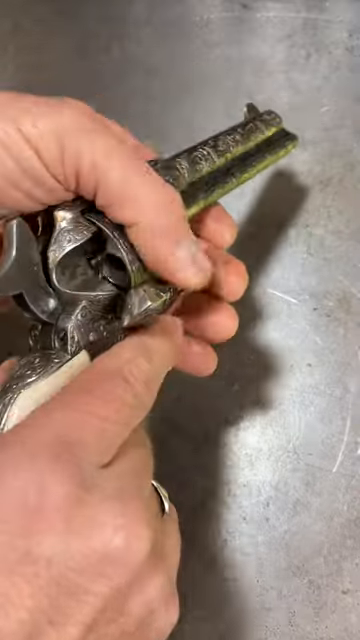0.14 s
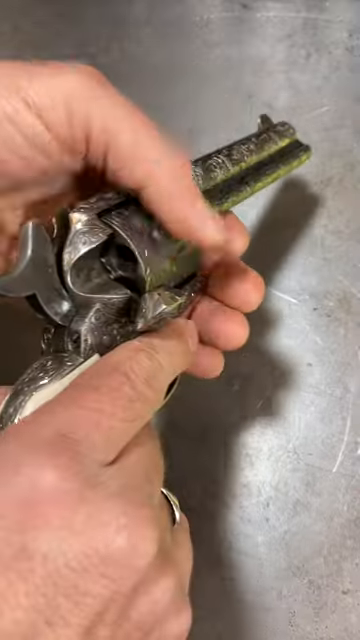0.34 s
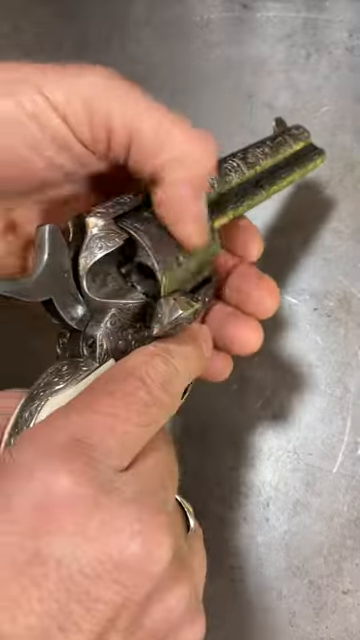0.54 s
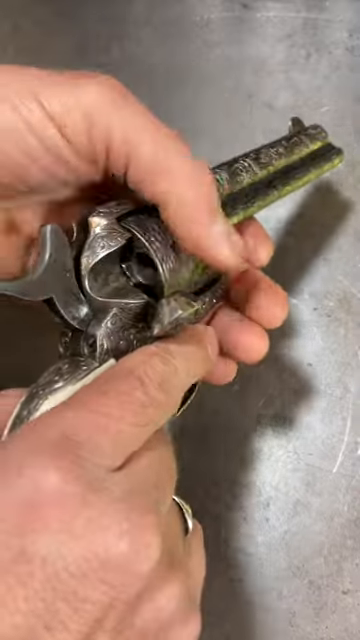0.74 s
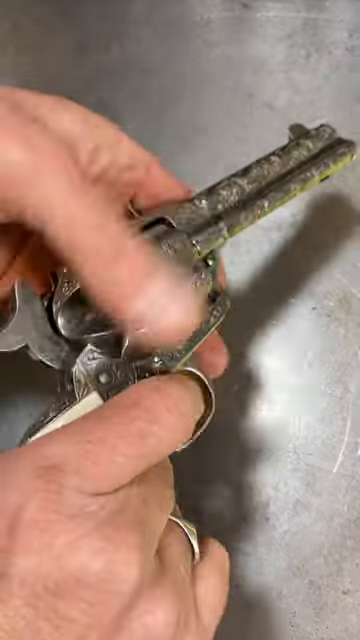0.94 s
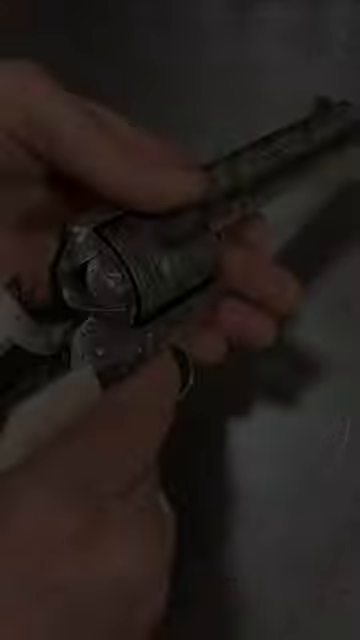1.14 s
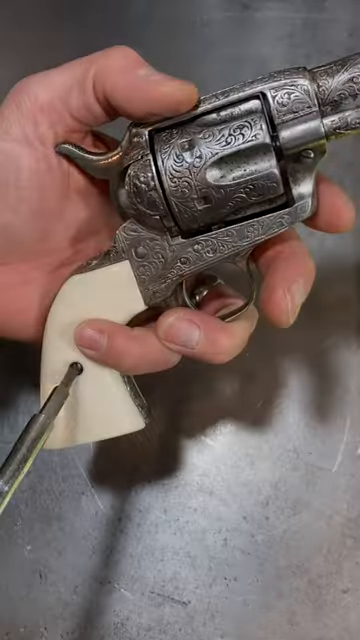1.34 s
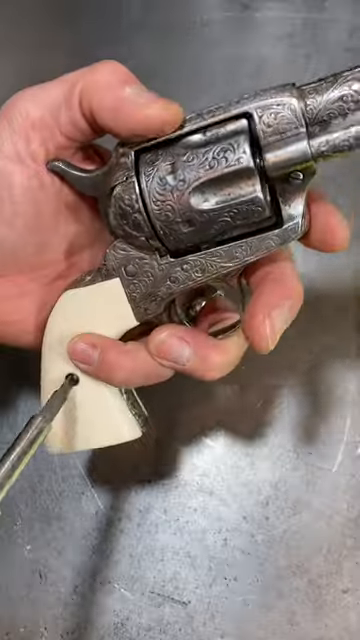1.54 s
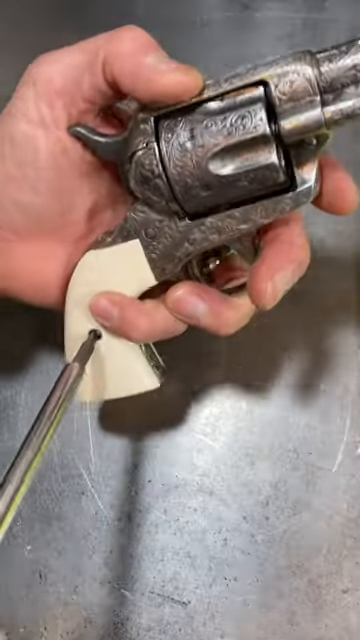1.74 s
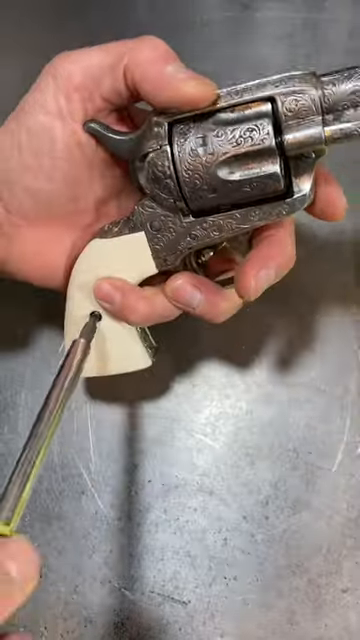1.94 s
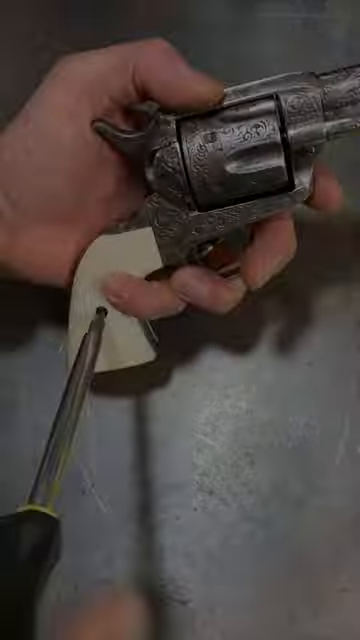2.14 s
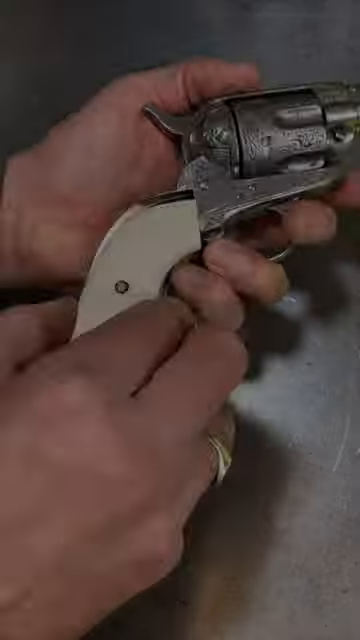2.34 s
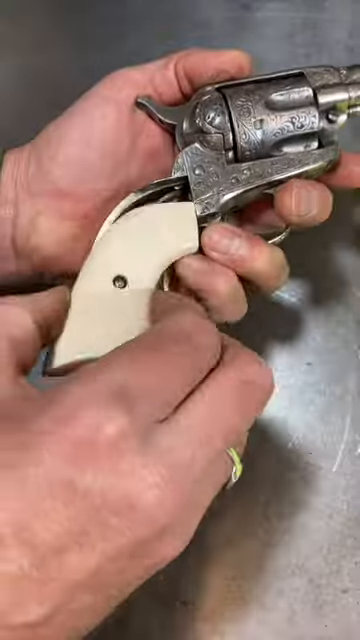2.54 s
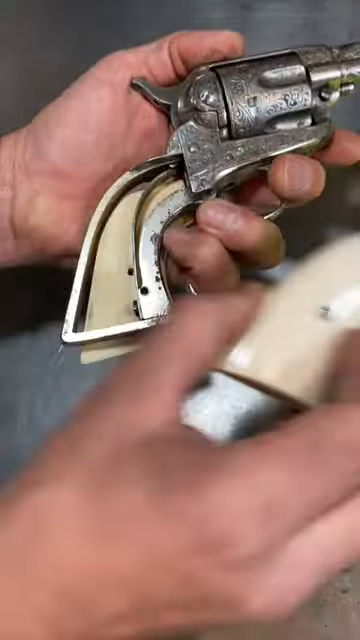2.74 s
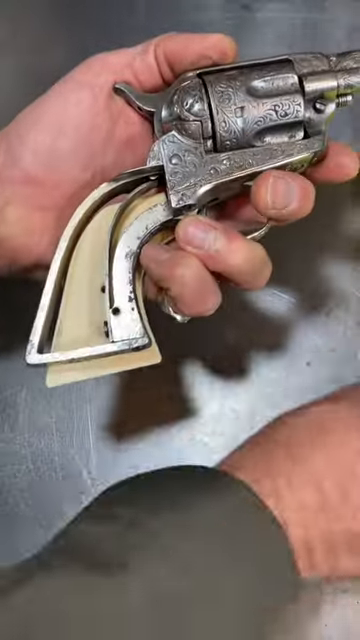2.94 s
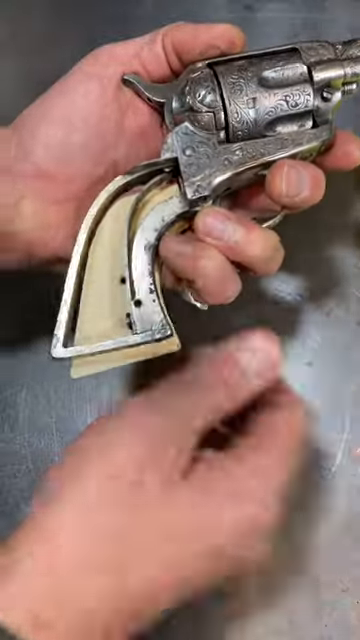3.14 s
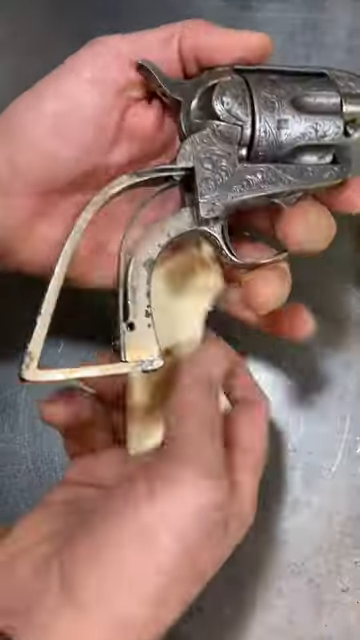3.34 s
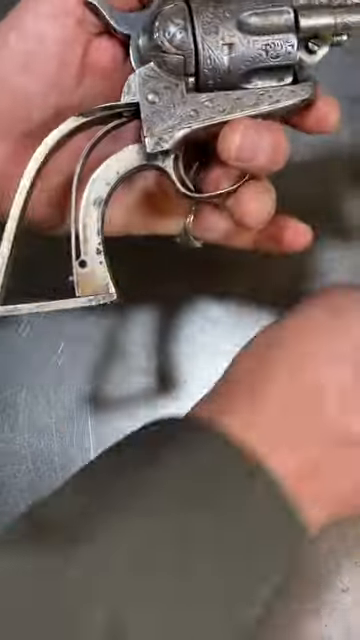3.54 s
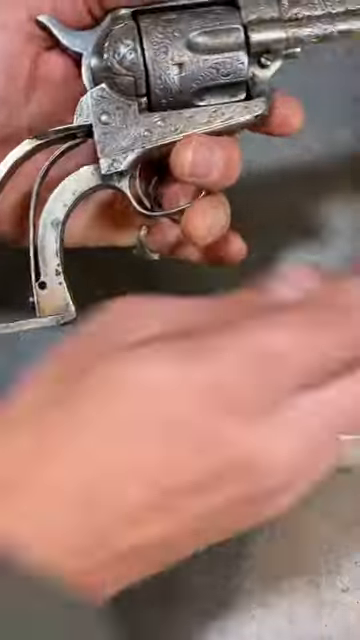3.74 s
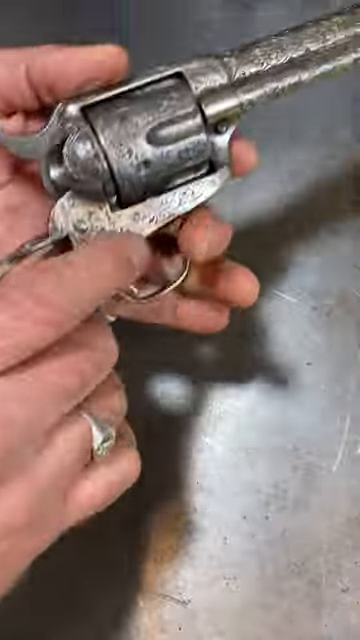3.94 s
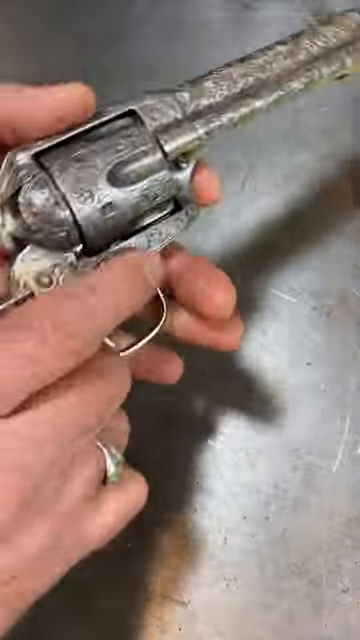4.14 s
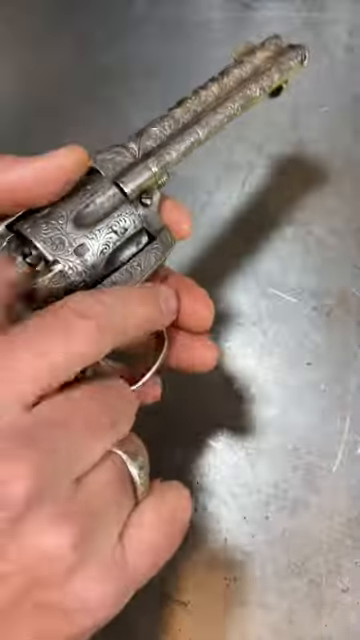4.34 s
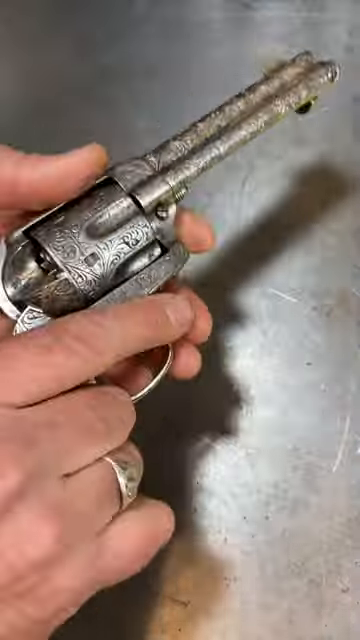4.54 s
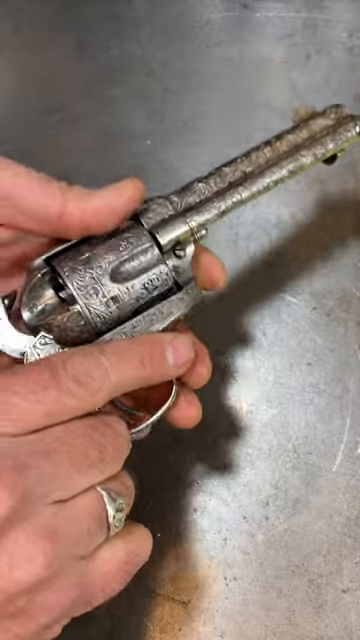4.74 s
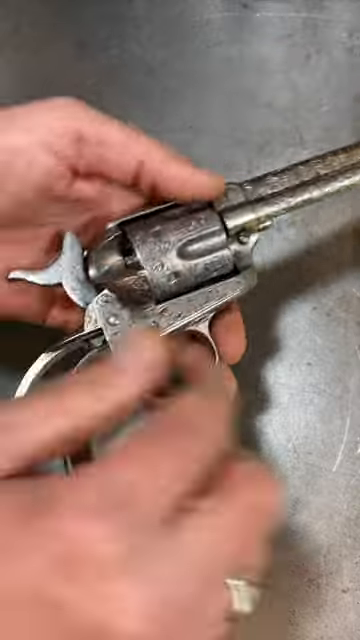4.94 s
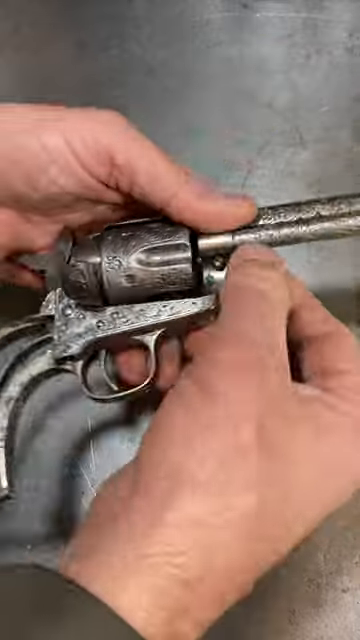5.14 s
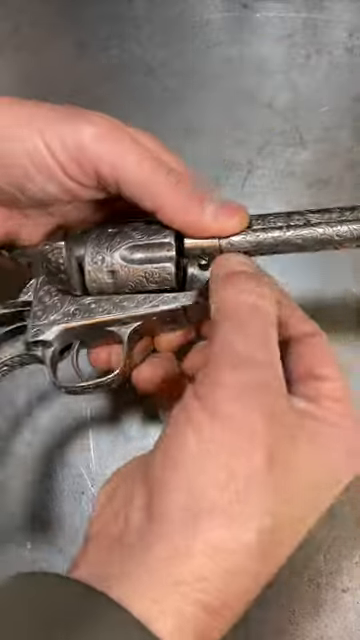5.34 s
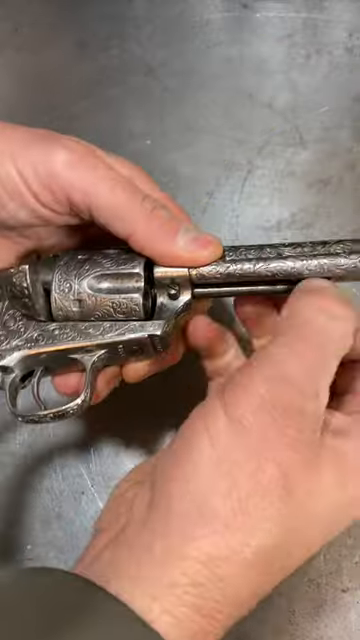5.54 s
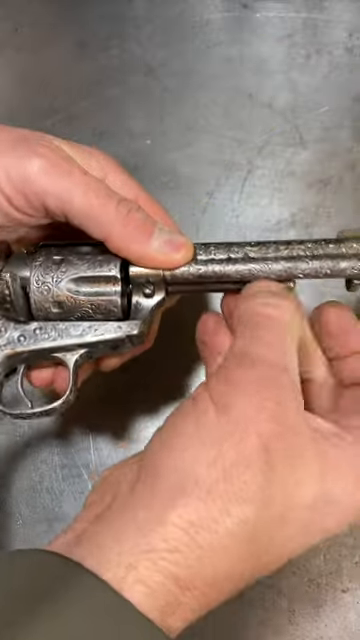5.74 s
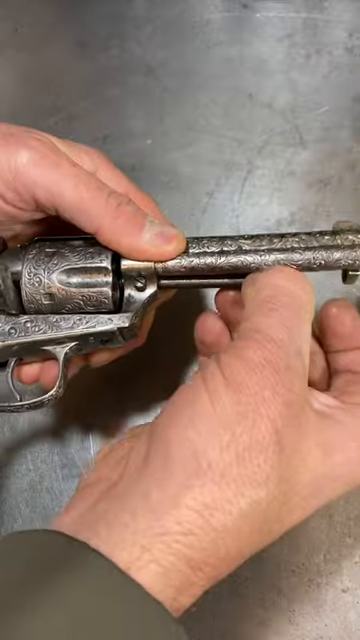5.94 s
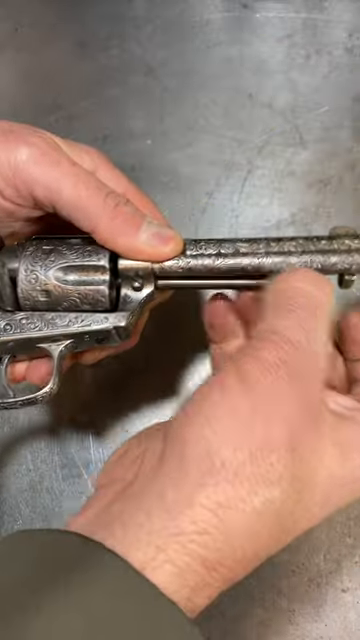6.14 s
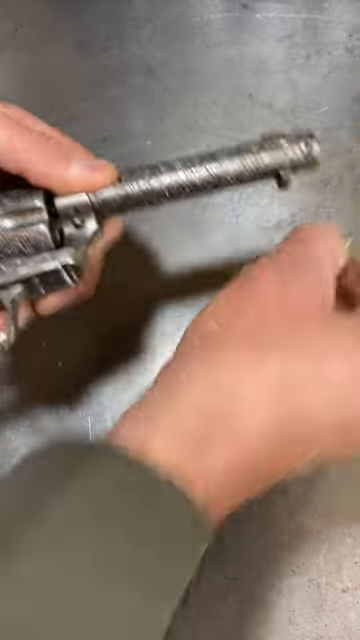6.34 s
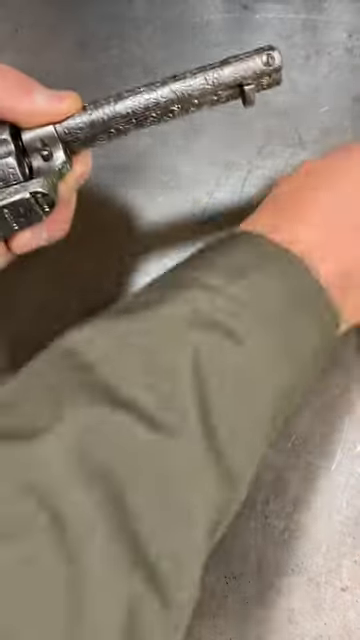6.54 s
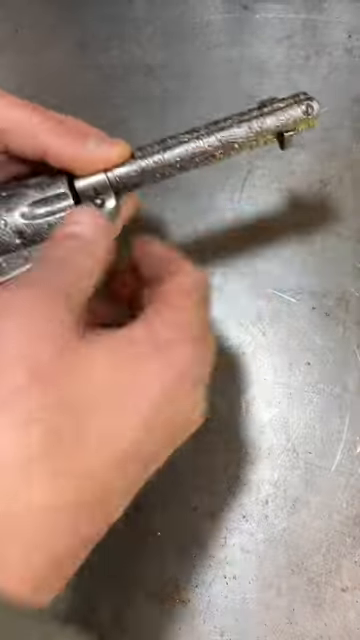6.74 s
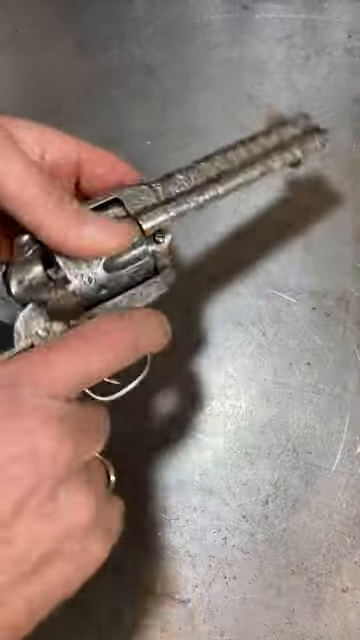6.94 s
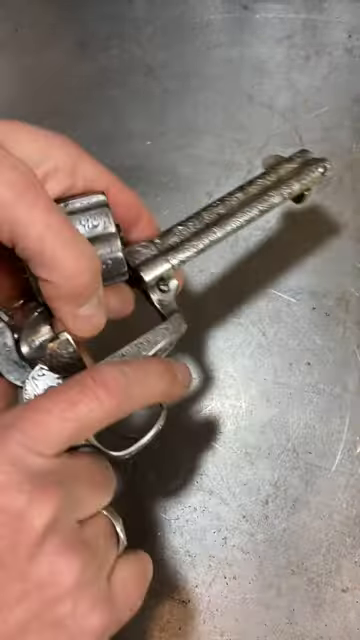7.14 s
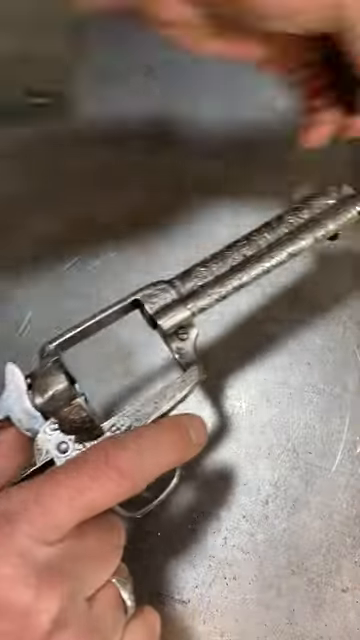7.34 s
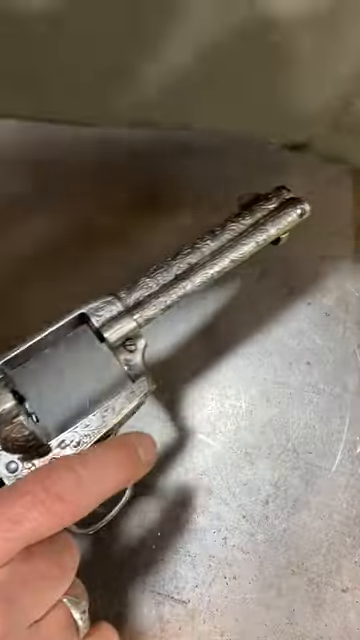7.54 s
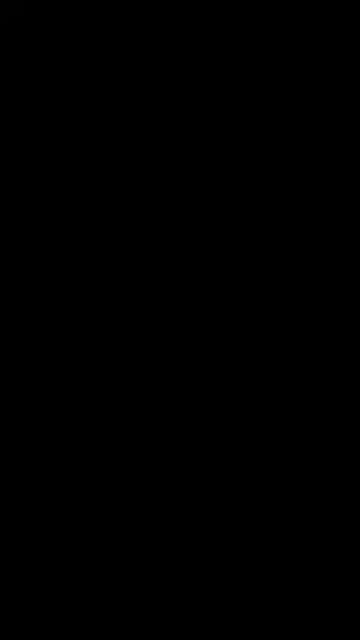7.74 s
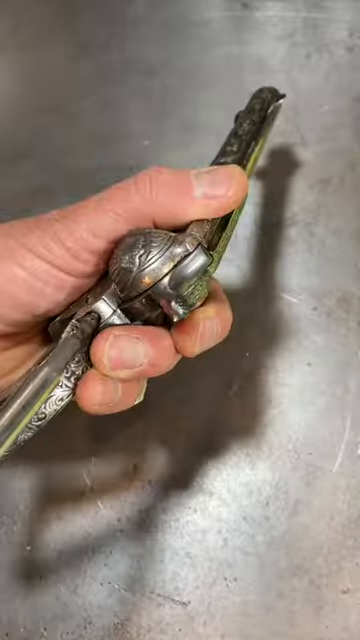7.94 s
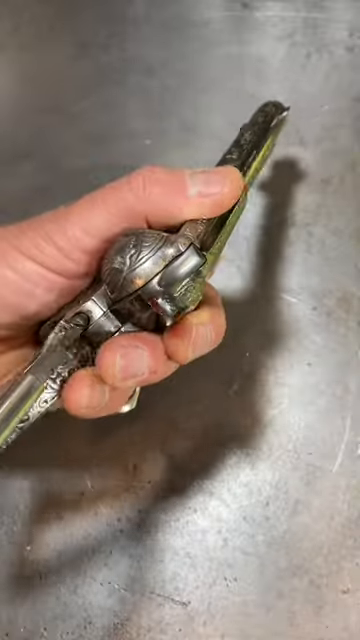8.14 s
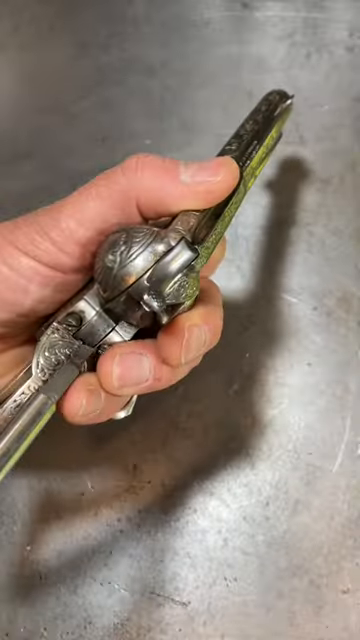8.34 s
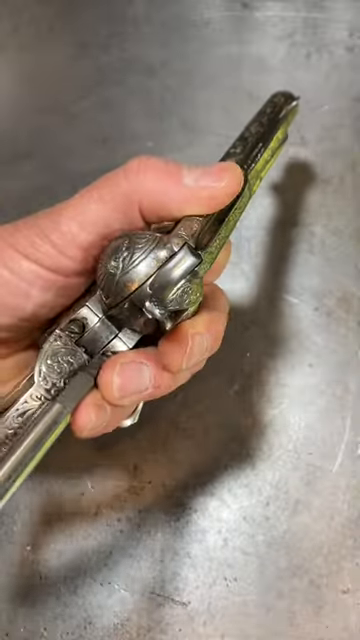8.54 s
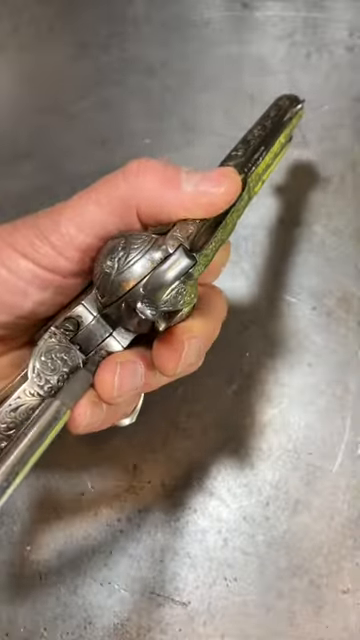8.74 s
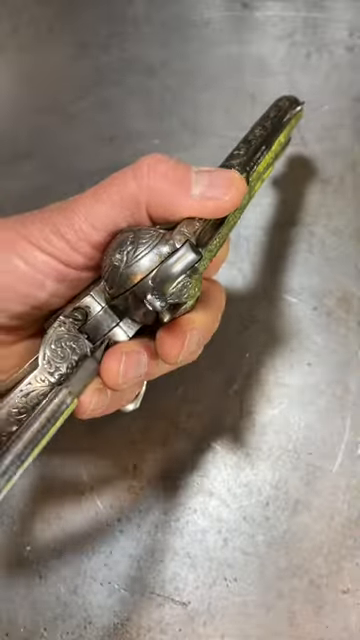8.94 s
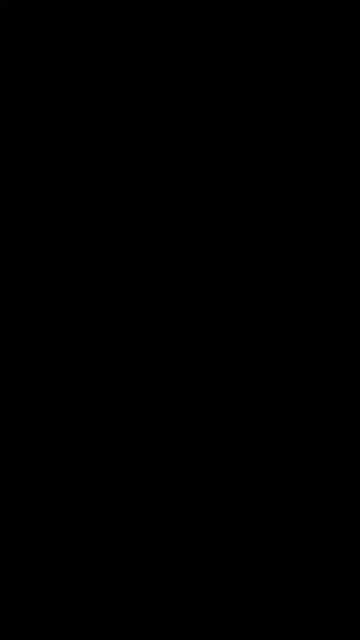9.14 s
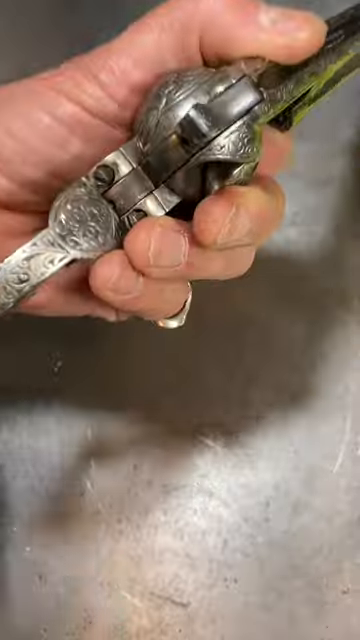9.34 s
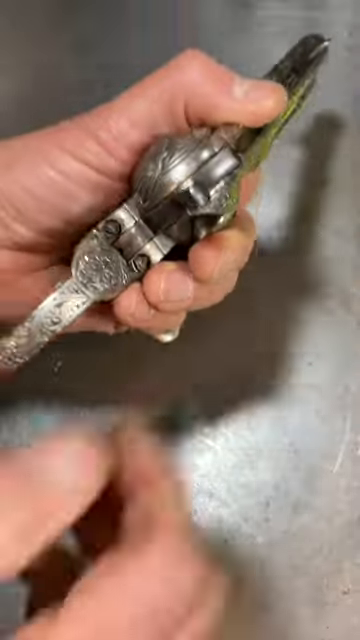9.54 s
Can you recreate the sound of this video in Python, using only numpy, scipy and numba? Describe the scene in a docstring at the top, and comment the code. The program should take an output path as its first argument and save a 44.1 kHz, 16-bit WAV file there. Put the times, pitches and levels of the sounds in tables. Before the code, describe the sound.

Close metallic clicks, hammer cocking, short steel scrapes and dull bench thuds as hands dismantle a single-action revolver in a small, quiet workshop.

```python
"""A single-action revolver is taken apart by hand over a steel bench, with a phone close by in a small workshop.
Steel snaps (ratchet, hammer, clicks, taps) are impulses with noisy chatter and ringing modes, tuned in brightness.
Pin and cylinder scrape in trains of slips; a grip panel chatters down; thuds are blows on the bench's modes.
A sleeve swishes as flickering noise with a gliding hollow tone.
Behind lie shaped rumble and hiss, a hum that wanders in pitch, and a short diffuse reverb."""
import sys
import numpy as np
from scipy import signal
from scipy.fft import rfft, irfft
from scipy.io import wavfile
from numba import njit

SR = 44100
rng = np.random.default_rng(int(sys.argv[2]) if len(sys.argv) > 2 else 0)


def master(y):
    """Save y as 16-bit WAV."""
    cut = np.clip(np.atleast_2d(y).T, -1, 1)
    pcm = np.round(cut * 32767)  # scale
    wavfile.write(sys.argv[1], SR, pcm.astype(np.int16))


N = 426888
TIME = np.arange(N) / SR
FREQ = np.arange(N // 2 + 1) * SR / N
TOP_HZ = 16000  # upper limit of the sound

# Steel contacts, all with: t/s, bright band level over 5 ms/dB, bright band f/Hz, frame knock level over 5 ms/dB
# the bolt drops into a notch of the turning cylinder
RATCHET_DROPS = [(0.138, -20, 10700, -58.5), (0.2932, -16.5, 13800, -57), (0.4427, -18.5, 14200, -83),
                 (0.5765, -21.5, 13100, -80), (0.7108, -21.5, 14000, -71), (0.8261, -21, 14100, -85),
                 (1.0083, -21, 7800, -47.5)]
# the bolt lifts with a light tick just before it drops
BOLT_LIFTS = [(0.101, -44, 7960, -83), (0.268, -45, 14000, -69), (0.4144, -46, 8000, -77),
              (0.8072, -45, 13000, -68)]
# single contacts of gate, screwdriver and pin
STEEL_CLICKS = [(1.1385, -23.5, 12000, -56), (1.2066, -26.5, 14200, -54), (1.3543, -41, 13700, -78),
                (1.3962, -47, 12000, -73), (1.4982, -47, 11000, -60), (1.8494, -47, 10400, -50.5),
                (2.044, -38.5, 14000, -51.5), (2.1365, -42, 11400, -54.5), (2.2041, -46, 9450, -53),
                (2.2735, -51, 5000, -62), (2.4242, -40, 7300, -55), (2.5126, -25, 8700, -53),
                (2.5178, -35, 5500, -68), (2.5301, -42, 5100, -44.5), (2.9121, -32.5, 6300, -44),
                (3.1946, -40, 6400, -43), (4.3573, -50, 3896, -72), (4.8189, -49, 7900, -60.5),
                (5.8401, -50, 3435, -66), (6.1728, -22.5, 13300, -50), (6.2553, -36.5, 14150, -59.5),
                (6.933, -32, 7050, -54.5), (7.0335, -35, 4100, -63), (7.0602, -41, 5000, -50.5),
                (7.3511, -45, 7100, -66), (7.7769, -55, 13750, -43.5), (7.9157, -31.5, 14000, -47),
                (7.9268, -38, 7050, -42.5), (8.1062, -36, 13800, -50), (8.149, -34.5, 13180, -48.5),
                (8.2194, -42, 10640, -57), (8.3111, -44, 11000, -53), (8.4716, -51, 11000, -56.5),
                (8.4956, -45.5, 12000, -59), (8.5926, -54, 4500, -58), (8.9684, -43, 11000, -50),
                (9.0678, -48, 13500, -69)]
# the hammer is drawn back through its notches; extra column: sharpness of the bright band (Q)
HAMMER_NOTCHES = [(4.291, -19, 10540, -44, 5.5), (4.5662, -27, 7000, -50, 0.23),
                  (4.7506, -29, 7940, -50, 0.35)]
# dry taps of screwdriver, base pin and cylinder against the frame
FRAME_TAPS = [(1.4083, -51, 6500, -45.5), (1.4852, -54, 10300, -53.5), (1.5078, -41.5, 9900, -43.5),
              (5.5515, -56.5, 2470, -61), (5.7177, -47.5, 3484, -45.5), (5.7313, -47.5, 3300, -53),
              (5.8145, -61, 3000, -60), (7.0837, -43, 4000, -62), (7.098, -39.5, 5860, -62),
              (7.1248, -31, 3600, -54), (7.1417, -43.5, 4300, -66), (7.3931, -48, 4490, -41)]
# colour shared by all steel contacts: f/Hz, relative level/dB
STEEL_COLOUR = [(1400, -18), (2500, -9), (4000, 4.5), (6500, 4), (9000, 3), (12000, 3.5), (14000, 11),
                (16000, 1.5)]
KNOCK_HZ, KNOCK_Q = 1670, 0.93  # the frame's dull knock under a click
# modes of the hand-damped steel frame: nominal f/Hz, relative level/dB, t60/s
FRAME_MODES = [(3370, 11.5, 0.017), (5000, 5.5, 0.033), (7070, 4, 0.024), (8100, -7.5, 0.018),
               (9980, 13, 0.016), (12000, 14, 0.0066), (12550, 2, 0.031), (14200, -7, 0.0062)]
# the cylinder sings on in many close modes: nominal f/Hz, relative level/dB
CYLINDER_MODES = [(3590, -16.5), (4400, -4), (5179, 2.5), (5850, -2.5), (7050, 1.5), (8037, -1.5),
                  (9297, -9.5), (10120, -7.5), (10360, -6), (10950, -3.5), (11780, -1), (12070, -4)]
CYLINDER_T60_S = 0.13
# the grip strap pings as a panel lets go: t/s, level before the mode weights/dB
STRAP_PINGS = [(2.5113, -38), (2.5303, -28.5), (3.195, -21.5)]
# modes of the grip strap: nominal f/Hz, relative level/dB, t60/s
STRAP_MODES = [(6370, 4, .013), (6950, -8, .01), (10150, -20, .03)]
# the base pin slides in its hole: start t/s, length/s, level/dB, grit against rasp/dB
PIN_STROKES = [(5.452, 0.042, -56, -10), (5.478, 0.038, -50, 2), (6.148, 0.019, -50.5, 0),
               (7.917, 0.0092, -56, -10)]
# modes of the loose base pin: nominal f/Hz, relative level/dB, t60/s
PIN_MODES = [(2460, 0, 0.034), (3550, 1.5, 0.021), (4600, -2, 0.023), (5900, -3, 0.022), (8300, -7, .02)]
# the cylinder judders out through the frame: start t/s, length/s, level/dB, grit against rasp/dB
CYLINDER_STROKES = [(7.024, 0.052, -43.5, -5), (7.088, 0.017, -42, -1), (7.134, 0.037, -45.5, -22)]
# modes of its chamber walls, damped by the fingers: nominal f/Hz, relative level/dB, t60/s
CHAMBER_MODES = [(2470, -7, 0.02), (3600, -5, 0.0088), (5070, 0, .012)]
# a loose grip panel clacks onto the bench: t/s, level over 30 ms/dB, t60 of the chatter/s
PANEL_CLACKS = [(3.6, -34.5, 0.058)]
# modes of the panel: f/Hz, relative level/dB, t60/s
PANEL_MODES = [(947, 1.5, .05), (1306, 0.5, 0.033), (1790, 10, .045), (2130, -9, 0.044), (2885, -20, 0.045)]
# parts land on the bench and settle: t/s, level over 50 ms/dB, corner f set by hardness/Hz,
# drum mode trim at that spot/dB, delay until it settles/s, settling blow before its filter/dB
BENCH_THUDS = [(2.9106, -38.5, 269, -3.5, .012, -6.5), (3.6011, -28.5, 1330, -0.5, 0.016, 1),
               (4.446, -52, 64.6, -22, 0.011, -25), (6.531, -29.5, 437, -1.5, .011, -3.5),
               (7.557, -29, 393, -4, .0185, -6.5), (9.3801, -26.5, 795, -16.5, 0.024, -15),
               (9.432, -37.5, 160, -7.5, 0.031, -8)]
# modes of the bench top: nominal f/Hz, relative level/dB, t60/s
BENCH_MODES = [(106, -2.5, 0.27), (136.6, 1.5, 0.082), (224, -3.5, 0.1), (323.3, -8.5, 0.19),
               (358.7, -0.5, 0.173), (396, -1.5, 0.09), (526.5, 0.5, 0.11), (567.5, 1, 0.12),
               (644.6, 0, 0.071), (695, -12, 0.25), (831, -13.5, 0.28), (1109, -3, 0.14)]
# the bench top's main drum mode: f/Hz, level before the trim at each spot/dB, t60/s
BENCH_DRUM = [(258.8, 10, 0.13)]
# strokes of sleeve and hand: t of the fastest moment/s, swell/s, die-away/s,
# hiss before trim/dB, hollow body before trim/dB, nominal hollow f at full speed/Hz
SLEEVE_STROKES = [(1.8, 0.22, 0.22, -68, -67, 1720), (2.768, 0.023, 0.017, -54.5, -51, 1430),
                  (2.855, 0.044, 0.038, -49.5, -44.5, 1570), (2.999, 0.015, 0.029, -57, -50, 1790),
                  (3.09, 0.12, 0.11, -61, -61, 1470), (3.5, 0.038, 0.12, -55, -52, 1560),
                  (3.724, 0.047, 0.054, -55.5, -51.5, 2190), (5.014, 0.05, 0.04, -54, -51.5, 1390),
                  (5.46, 0.033, 0.047, -66.5, -66.5, 1800), (6.365, 0.018, 0.074, -53.5, -47, 1690),
                  (6.41, 0.054, 0.079, -59.5, -60.5, 1560), (6.627, 0.032, 0.053, -51.5, -49, 2230),
                  (6.781, 0.11, 0.032, -59.5, -61, 1490), (7.371, 0.044, 0.075, -61, -59.5, 1760),
                  (7.62, 0.18, 0.17, -67.5, -66, 1620), (9.31, 0.04, 0.069, -51.5, -50.5, 1850),
                  (9.481, 0.0098, 0.058, -54.5, -55.5, 1580), (9.568, 0.022, 0.034, -58.5, -53, 1900)]
# hiss of cloth, also used for the room's air: f/Hz, relative density/dB per Hz
HISS_COLOUR = [(1500, -42), (2800, -7.5), (4500, 1), (7000, -0.5), (10500, -1), (12500, -2), (13500, 2),
               (16000, -57)]
# body of cloth, also used for the room's midrange: f/Hz, relative density/dB per Hz
BODY_COLOUR = [(60, -34), (250, -3.5), (600, -7), (1000, -6.5), (1600, -5), (2200, -7), (2900, -8),
               (6000, -21)]
# a low hum: t/s, f/Hz, level before it wavers/dB
HUM_COURSE = [(1.22, 155, -73), (1.3, 155.8, -55), (2.26, 160.3, -53), (2.33, 147.6, -73),
              (2.45, 146, -53.5), (3.5, 142.8, -55.5), (4.1, 141.5, -50), (4.42, 138.4, -53),
              (4.72, 138.1, -69.5), (5.55, 135.5, -64.5), (6.4, 141.4, -72), (7.3, 138.6, -100),
              (7.88, 165, -62.5), (9.09, 169.4, -66), (9.2, 153.6, -60.5)]
# the workshop's background before trims: t/s, rumble/dB, airy hiss/dB, midrange rush/dB
BACKGROUND_COURSE = [(0, -68, -74, -68), (.8, -62.5, -74, -72), (1.3, -65, -78.5, -71),
                     (2.6, -67.5, -80, -71), (4.3, -64, -77, -69.5), (4.47, -70.5, -81, -75.5),
                     (5.8, -73, -76, -71.5), (6.1, -72.5, -90, -80.5), (6.9, -68.5, -66.5, -63),
                     (7.22, -86, -72, -72), (7.9, -67.5, -78.5, -67), (8.5, -69, -76, -65),
                     (9.1, -70.5, -68.5, -60.5), (9.68, -55, -70, -71)]
# low room rumble: f/Hz, relative density/dB per Hz
ROOM_RUMBLE = [(25, -24), (50, -24.5), (75, -1), (103, 8.5), (135, 9.5), (200, 4.5), (300, -6.5),
               (450, -4.5), (650, -14), (1200, -12.5), (3000, -55)]
# the two microphone ports: f/Hz, phase between them for near sounds/rad, side against mid for diffuse sound/dB
MIC_PORTS = [(96.3, 0, -25.5), (393, 0, -10.5), (745, 0.62, -3.5), (1340, 1.34, 2), (4300, -0.1, -3),
             (5640, 1.33, 0.5), (9000, 1.55, -2), (11000, 0.03, -8), (12300, 1.57, 2), (13500, 3.5, 28)]


def steel(rows, q, chatter_s, chatter_db, frame_db, sing_db, size=4096):
    """Steel snaps and chatters, frame and cylinder ring; returns direct sound and the plain snaps fed to the room."""
    direct, outward, t = np.zeros(N), np.zeros(N), np.arange(size) / SR
    snap = np.zeros(size)
    snap[round(SR * .0003)] = 1
    # each cylinder mode is doubled, and detuning makes the pair beat
    cylinder = [(*mode, CYLINDER_T60_S) for mode in CYLINDER_MODES + CYLINDER_MODES]
    for s, db, hz, knock_db, *own_q in rows:
        chatter = rng.standard_normal(size) * np.exp(-np.minimum(t / chatter_s, 20) ** 2)
        frame = ring(FRAME_MODES, t, scatter_db=2, detune=.04)
        song = ring(cylinder, t, scatter_db=3, detune=.018)
        burst = snap.copy()
        # levels are energies against the snap
        for level, part in ((chatter_db, chatter), (frame_db, frame), (sing_db, song)):
            burst += undb(level) * part / np.linalg.norm(part)
        contact = db, hz, knock_db, own_q[0] if own_q else q
        add(direct, s, coloured(burst, *contact))
        add(outward, s, coloured(snap, *contact))
    return direct, outward


def coloured(burst, db, bright_hz, knock_db, q):
    """Put a contact's weight in its bright band, with the frame's dull knock underneath."""
    size, window = len(burst), SR * .005
    hz = np.maximum(np.arange(size + 1) * SR / (2 * size), 1)
    spectrum = rfft(burst, 2 * size) / np.hypot(1, (hz / TOP_HZ) ** 24)

    def peak(centre, sharpness):
        """Response of a resonant band."""
        return 1 / np.hypot(1, sharpness * (hz / centre - centre / hz))

    def scaled(part, level):
        """Set the rms level over 5 ms from the spectrum's energy."""
        return undb(level) * part / np.sqrt(np.sum(abs(part) ** 2) / size / window)

    points = np.array(STEEL_COLOUR)
    tint = undb(np.interp(np.log(hz), np.log(points[:, 0]), points[:, 1]))
    snap = spectrum * peak(bright_hz, q) * tint
    knock = spectrum * peak(KNOCK_HZ, KNOCK_Q) ** 2 / np.hypot(1, (hz / KNOCK_HZ / 2) ** 2) ** 2
    return irfft(scaled(snap, db) + scaled(knock, knock_db))[:size]


def ring(modes, t, scatter_db, detune):
    """Sum decaying modes; each blow weights and detunes them anew (detune is a share of the pitch)."""
    hz, db, t60 = np.array(modes).T[:, :, None]
    weight, shift, side = rng.standard_normal((3, len(modes), 1))
    gain = np.sign(side) * undb(db + scatter_db * weight)
    tones = np.sin(2 * np.pi * hz * (1 + detune * shift) * t)
    return np.sum(gain * fade(t, t60) * tones, axis=0)


def strap():
    """The freed grip strap rings briefly in its own modes."""
    track, t = np.zeros(N), np.arange(SR // 10) / SR
    for s, db in STRAP_PINGS:
        add(track, s, undb(db) * ring(STRAP_MODES, t, scatter_db=1, detune=.003))
    return track


def scrapes(rows, modes, slips_per_s, spread_db, rasp_db, rasp_hz=(2550, 5700), grit_hz=(6000, 12500), count=256):
    """Steel slides on steel in uneven slips; each rings the part, rasps briefly and sheds fine grit."""
    track, t = np.zeros(N), np.arange(SR // 5) / SR
    for s, length, db, grit_db in rows:
        place = (np.arange(count) + rng.random(count)) / (length * slips_per_s)  # share of the stroke
        within = np.minimum(place, 1)
        pressure = np.sin(np.pi * within) ** .4 * (place < 1)
        force = pressure * undb(spread_db * rng.uniform(-0.86, 1, count))
        slips = np.bincount((within * length * SR).astype(int), force, len(t))
        song = signal.fftconvolve(slips, ring(modes, t, scatter_db=2, detune=.002))[:len(t)]
        friction = signal.fftconvolve(slips, fade(t, .0028))[:len(t)] * rng.standard_normal(len(t))
        rasp = band(friction, *rasp_hz) + undb(grit_db) * band(friction, *grit_hz)
        scrape = unit(song) + undb(rasp_db) * rasp
        add(track, s, undb(db) * scrape / np.std(scrape[:int(length * SR)]))
    return track


def panel(crack_db=0, contact_hz=(750, 2400), chatter_db=-18):
    """One hard blow, then a dying chatter of small ones: a rough crack over the panel's short ring."""
    track, t = np.zeros(N), np.arange(SR // 4) / SR
    for s, db, t60 in PANEL_CLACKS:
        chatter = unit(rng.standard_normal(len(t)) ** 3) * fade(t, t60)  # cubing makes the blows sparse
        blows = band((t == 0) + undb(chatter_db) * chatter, *contact_hz)
        song = signal.fftconvolve(blows, ring(PANEL_MODES, t, 0, 0))[:len(t)]
        clack = unit(song) + undb(crack_db) * blows
        add(track, s, undb(db) * clack / np.std(clack[:int(.03 * SR)]))
    return track


def bench(dense_db=1, dense_t60=0.21, dense_hz=1300, lowest_hz=98, settle_hz=380):
    """A part lands, then settles with a blow no brighter; a softer landing favours the low modes."""
    track, t = np.zeros(N), np.arange(SR // 2) / SR
    dense_band = signal.butter(3, [170, dense_hz], "band", fs=SR, output="sos")
    low_cut = signal.butter(4, lowest_hz, "high", fs=SR, output="sos")
    for s, db, corner_hz, drum_db, settle_s, settle_db in BENCH_THUDS:
        thud = np.zeros(SR)
        for delay, level, hz in ((0, 0, corner_hz), (settle_s, settle_db, min(corner_hz, settle_hz))):
            # decaying noise stands in for modes too dense to tell apart
            dense = unit(signal.sosfilt(dense_band, rng.standard_normal(len(t)))) * fade(t, dense_t60)
            modes = ring(BENCH_MODES, t, scatter_db=1.5, detune=0.0052)
            modes = modes + undb(drum_db) * ring(BENCH_DRUM, t, 0, 0)
            body = signal.sosfilt(low_cut, modes + undb(dense_db) * dense)
            softness = signal.butter(2, hz, fs=SR, output="sos")
            add(thud, delay, undb(level) * signal.sosfilt(softness, body))
        add(track, s, undb(db) * thud / np.std(thud[:SR // 20]))
    return track


def sleeve(hiss_db=7.0, body_db=1, broad_db=-9, width=0.97, glide=0.47, fold=0.23, folds_per_s=40, grain_db=2):
    """Cloth rubs on cloth: fine-grained hiss over a hollow tone that rises with speed and wavers as folds catch."""
    hiss = flutter(noise(HISS_COLOUR), [0, 3500, 5500, 8000, 11000, SR], 60, 1.3) * undb(1.3 * walk(250))
    hiss_power, body_power, pitch = 0, 1e-20, 1e-17
    for s, swell_s, die_s, hiss_level, body_level, hz in SLEEVE_STROKES:
        speed = stroke(s, swell_s, die_s)
        power = (undb(body_level) * speed) ** 2
        hiss_power = hiss_power + (undb(hiss_level) * speed) ** 2
        body_power = body_power + power
        pitch = pitch + power * hz * (1 + glide * (speed - 1))  # louder strokes rule the pitch
    centre = np.clip(pitch / body_power * np.exp(fold * walk(folds_per_s)), 300, 6000)
    rub = flutter(noise(BODY_COLOUR), [0, 1100, 1600, 2200, SR], 38, 3.2)
    tone = unit(np.array([hollow(side, centre, float(width)) for side in rub]))
    body = (tone + undb(broad_db) * rub) * undb(grain_db * walk(130))
    return hiss * np.sqrt(hiss_power) * undb(hiss_db) + body * np.sqrt(body_power) * undb(body_db)


def stroke(s, swell_s, die_s, roundness=1.54):
    """An arm speeds up and slows down: a lopsided bell in time."""
    distance = np.maximum((s - TIME) / swell_s, (TIME - s) / die_s)
    return np.exp(-.5 * np.minimum(distance, 10) ** roundness)


def flutter(x, edges_hz, rate, depth_db):
    """Folds of cloth catch and let go: each band wavers on its own."""
    spectrum, out = rfft(x), 0
    for lo, hi in zip(edges_hz, edges_hz[1:]):
        inside = (FREQ >= lo) & (FREQ < hi)
        out = out + irfft(spectrum * inside, N) * undb(depth_db * walk(rate))
    return out


@njit
def hollow(x, hz, width):
    """A band-pass resonance whose centre moves; width is a share of the centre."""
    y, band_state, low_state = np.empty(len(x)), 0., 0.
    for i in range(len(x)):
        g = np.tan(np.pi * hz[i] / SR)
        v = (band_state + g * (x[i] - low_state)) / (1 + g * (g + width))
        band_state = 2 * v - band_state
        low_state = low_state + 2 * g * v
        y[i] = v
    return y


def workshop(rumble_db=5.5, hiss_db=9.0, mids_db=2.5):
    """Low room rumble, a nearly pure hum, and hiss and midrange coloured like the cloth."""
    waver_db = 1.2 * walk(9)
    swell_db = .8 * walk(6) + 2 * walk(30)
    phase = 2 * np.pi * np.cumsum(curve(HUM_COURSE)) / SR
    hum = np.sqrt(2) * np.sin(phase) * undb(curve(HUM_COURSE, axis=2) + waver_db)
    rumble = noise(ROOM_RUMBLE) * undb(curve(BACKGROUND_COURSE) + rumble_db)
    air = noise(HISS_COLOUR) * undb(curve(BACKGROUND_COURSE, axis=2) + hiss_db)
    mids = noise(BODY_COLOUR) * undb(curve(BACKGROUND_COURSE, axis=3) + mids_db)
    return hum + (rumble + air + mids) * undb(swell_db)


def room(x, wet_db, early_t60, late_db, late_t60):
    """Early scatter from bench and hands, then a longer, fainter tail from the walls, as decaying noise."""
    t = np.arange(SR // 2) / SR
    build_up = 1 - np.exp(-t / .002)
    envelope = build_up * (fade(t, early_t60) + undb(late_db) * fade(t, late_t60))
    tails = rng.standard_normal((2, len(t))) * envelope / np.sqrt(2 * np.sum(envelope ** 2))
    return undb(wet_db) * diffuse(*(signal.fftconvolve(x, tail)[:N] for tail in tails))


def near(x):
    """A close source reaches the two ports out of step."""
    turn = np.exp(.5j * shape(MIC_PORTS))
    return irfft(rfft(x) * np.array([turn, 1 / turn]), N)


def diffuse(mid, side):
    """Left and right for sound from all around: alike in the bass, opposed in the top treble."""
    angle = np.arctan(undb(shape(MIC_PORTS, axis=2)))
    mid = irfft(rfft(mid) * np.cos(angle), N)
    side = irfft(rfft(side) * np.sin(angle), N)
    return np.array([mid + side, mid - side])


def noise(colour):
    """Diffuse noise of a given colour."""
    gain = undb(shape(colour))
    return diffuse(*(unit(irfft(rfft(rng.standard_normal(N)) * gain, N)) for _ in range(2)))


def band(x, lo_hz, hi_hz):
    """One band of a sound, at rms 1."""
    sos = signal.butter(3, [lo_hz, min(hi_hz, TOP_HZ)], "band", fs=SR, output="sos")
    return unit(signal.sosfilt(sos, x))


def undb(db):
    """Decibels to gain."""
    return 10 ** (np.asarray(db) / 20)


def unit(x):
    """Scale to rms 1."""
    return x / np.sqrt(np.mean(x ** 2) + 1e-20)


def curve(rows, axis=1):
    """One column of a time table at every sample."""
    rows = np.array(rows)
    return np.interp(TIME, rows[:, 0], rows[:, axis])


def shape(rows, axis=1):
    """One column of a frequency table at every bin, interpolated over log frequency."""
    rows = np.array(rows)
    return np.interp(np.log(FREQ + 1), np.log(rows[:, 0]), rows[:, axis])


def fade(t, t60):
    """Exponential decay by 60 dB in t60 seconds."""
    return np.exp(-np.log(1000) * t / t60)


def walk(rate, count=3000):
    """Random wander: straight lines between normal draws, rate of them a second."""
    return np.interp(TIME * rate, np.arange(count), rng.standard_normal(count))


def add(track, s, sound):
    """Mix a sound into a track at time s."""
    i = max(int(s * SR), 0)
    track[i:i + len(sound)] += sound[:N - i]


def scene():
    """Gun, bench and sleeve in the workshop."""
    ratchet, ratchet_out = steel(RATCHET_DROPS, q=1.2, chatter_s=0.0034, chatter_db=10.5, frame_db=1.5, sing_db=-5.5)
    clicks, clicks_out = steel(STEEL_CLICKS + BOLT_LIFTS, q=1.37, chatter_s=0.0013, chatter_db=6,
                               frame_db=2.0, sing_db=-32.0)
    hammer, hammer_out = steel(HAMMER_NOTCHES, q=1, chatter_s=0.0014, chatter_db=0.5, frame_db=-11.5, sing_db=-38)
    taps, taps_out = steel(FRAME_TAPS, q=2.7, chatter_s=0.0017, chatter_db=-5, frame_db=-7.5, sing_db=-38)
    pin = scrapes(PIN_STROKES, PIN_MODES, slips_per_s=910, spread_db=7, rasp_db=-7)
    cylinder = scrapes(CYLINDER_STROKES, CHAMBER_MODES, slips_per_s=380, spread_db=2, rasp_db=6)
    small_parts = strap() + pin + cylinder + panel()
    thuds = bench()
    outward = ratchet_out + clicks_out + undb(-1.5) * hammer_out + undb(-3.5) * taps_out + small_parts
    gun_room = room(outward, wet_db=-5.0, early_t60=0.059, late_db=-19, late_t60=0.2)
    bench_room = room(thuds, wet_db=-11, early_t60=0.51, late_db=-5, late_t60=0.64)
    close = near(ratchet + clicks + hammer + taps + small_parts + thuds)
    return close + gun_room + bench_room + sleeve() + workshop()


def record(dry):
    """The phone cuts the top with a steep low-pass."""
    return signal.sosfilt(signal.ellip(8, .2, 70, TOP_HZ, fs=SR, output="sos"), dry)


dry = scene()
out = record(dry)
master(out)
```